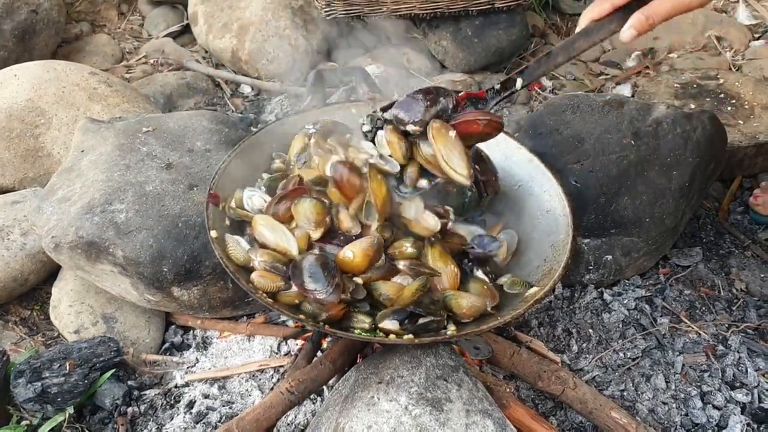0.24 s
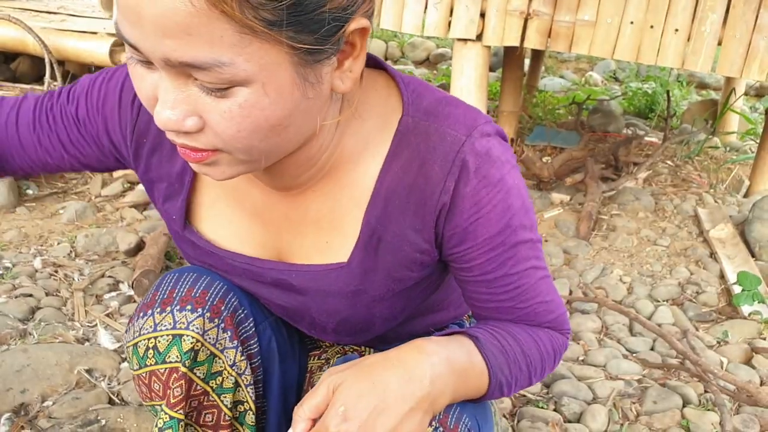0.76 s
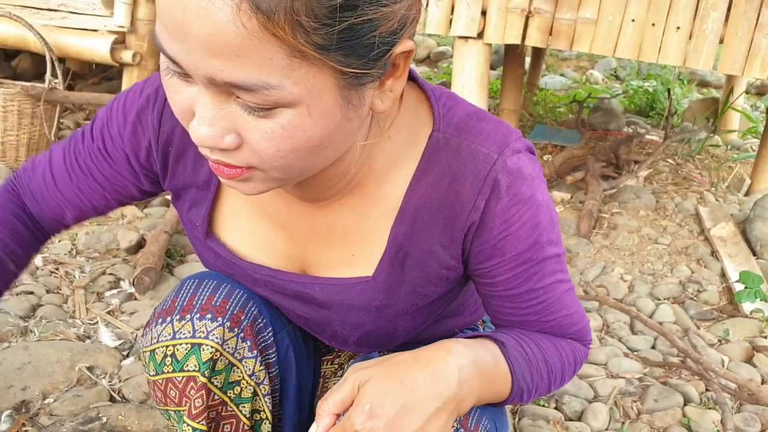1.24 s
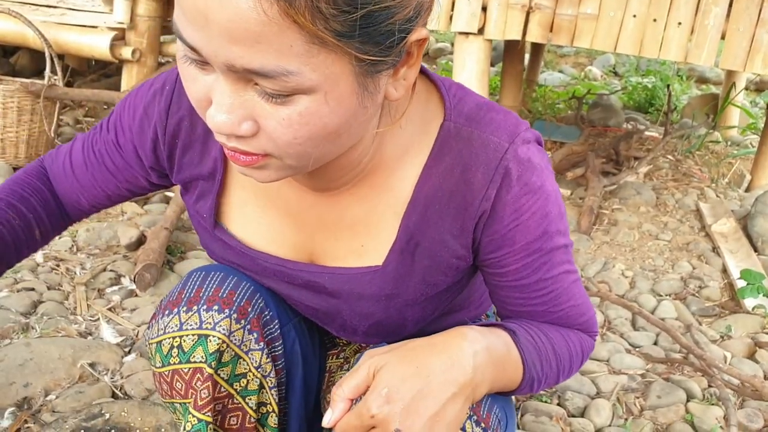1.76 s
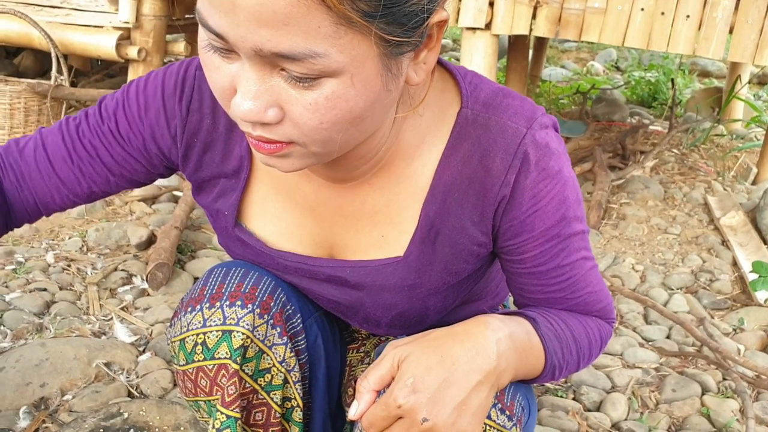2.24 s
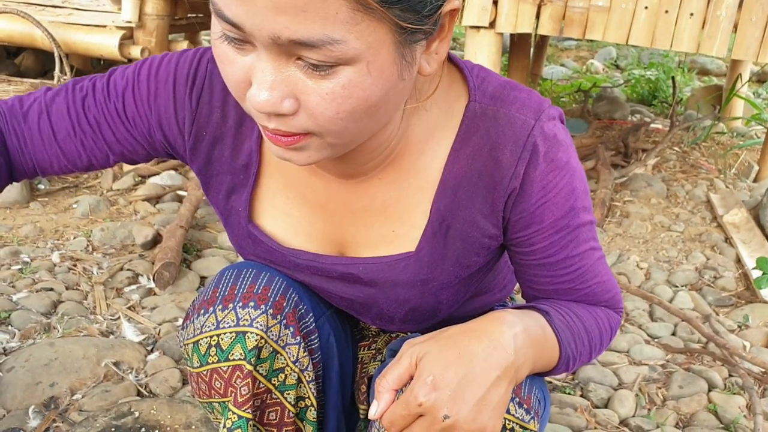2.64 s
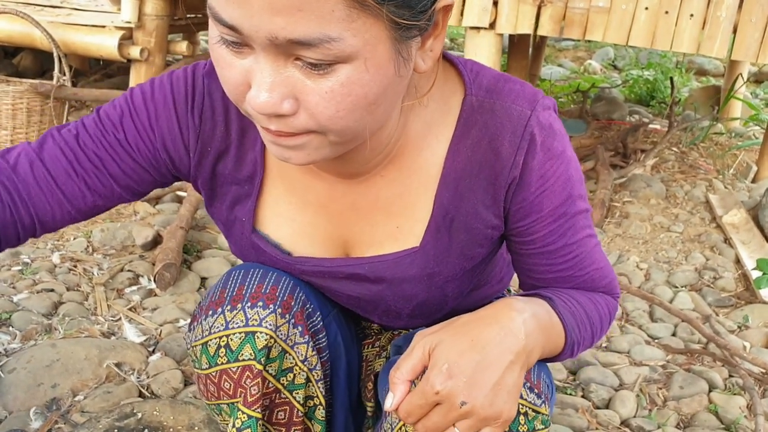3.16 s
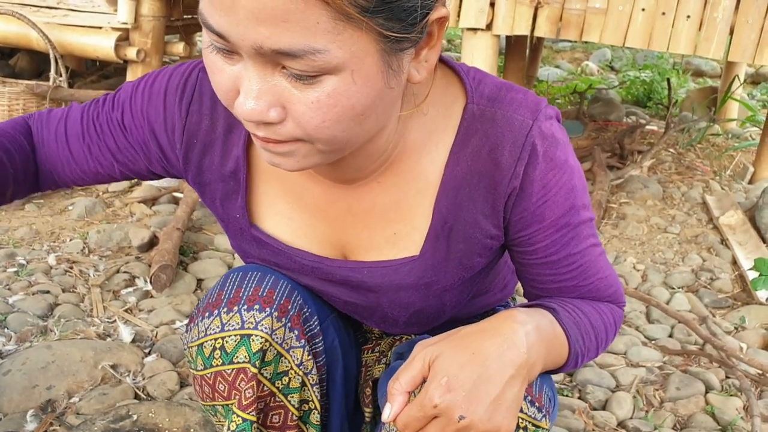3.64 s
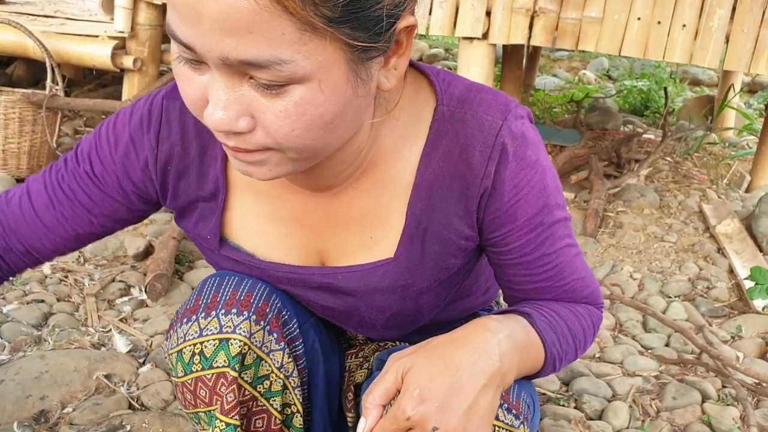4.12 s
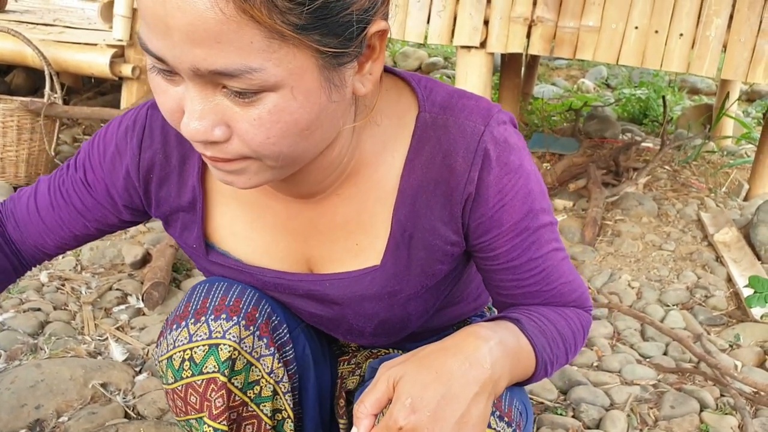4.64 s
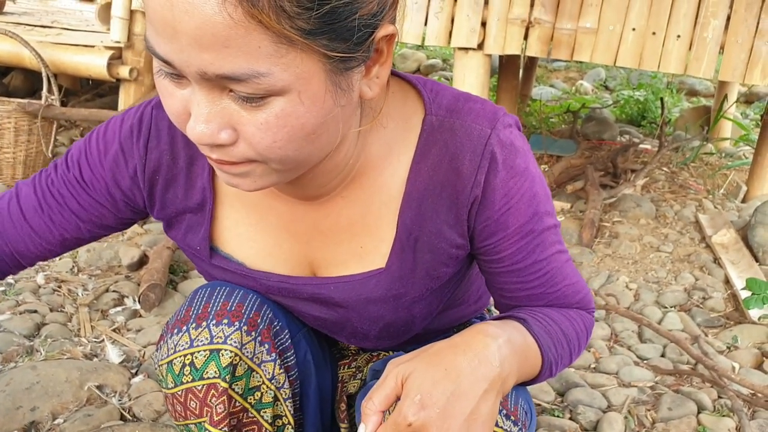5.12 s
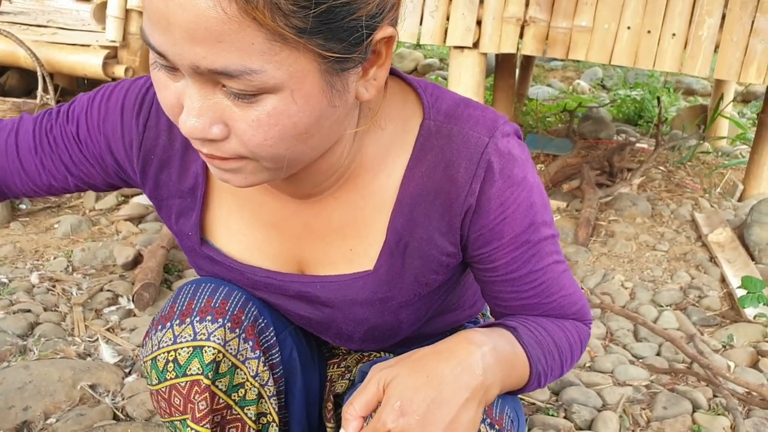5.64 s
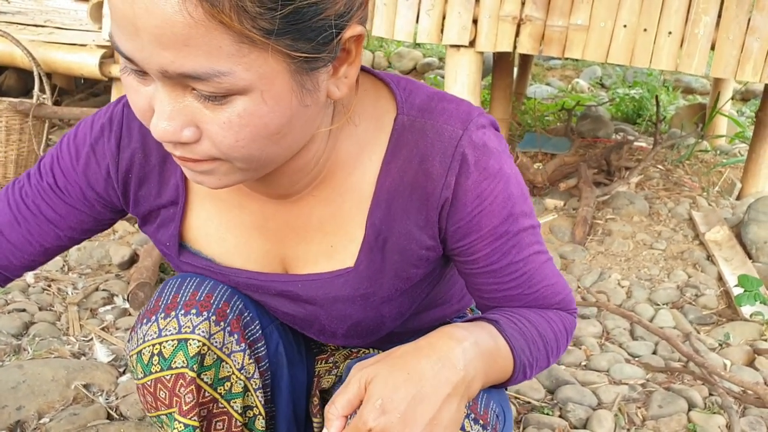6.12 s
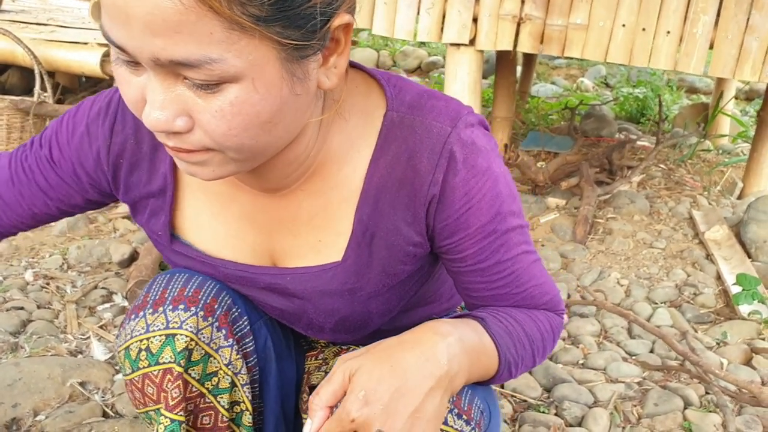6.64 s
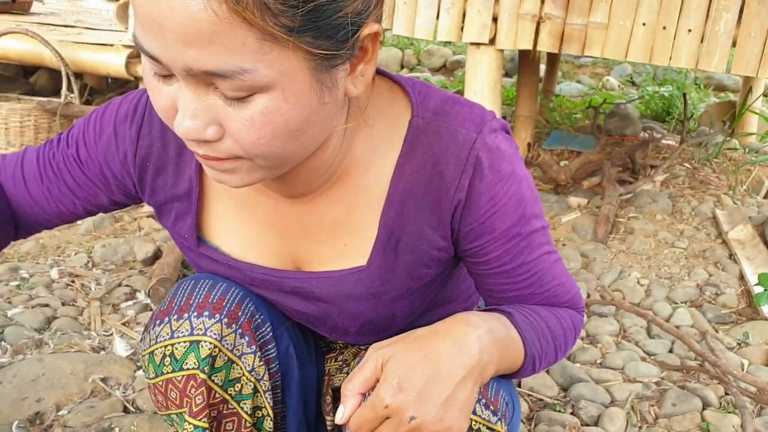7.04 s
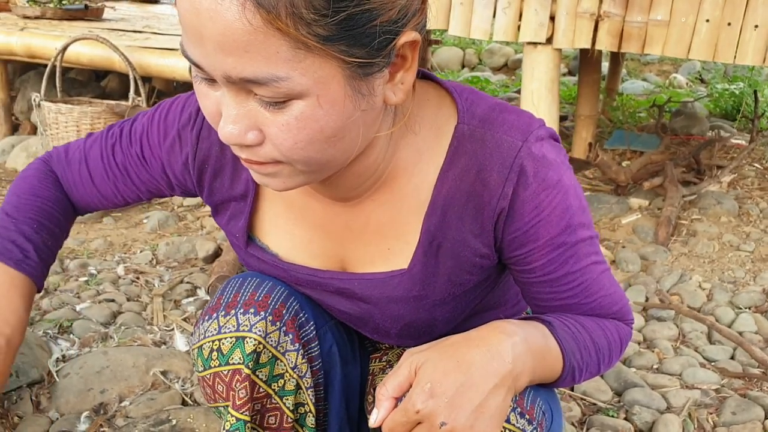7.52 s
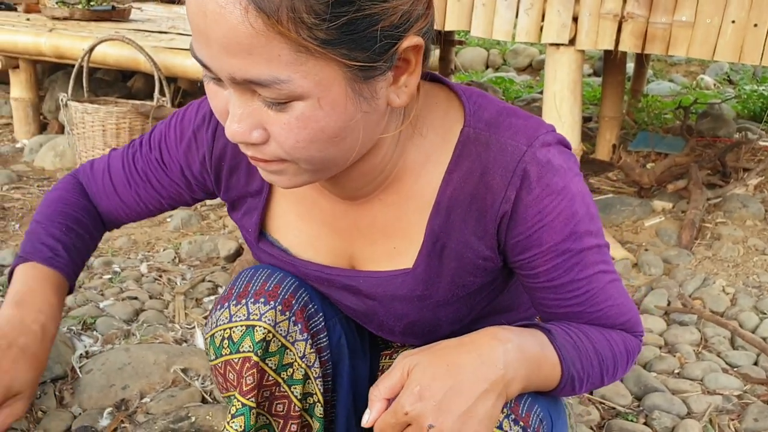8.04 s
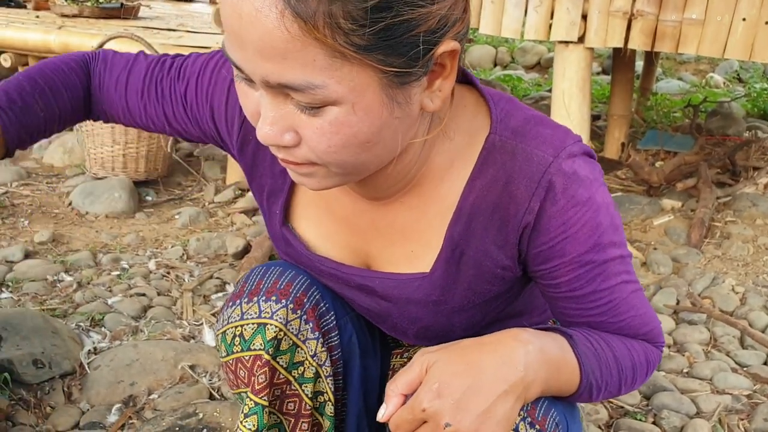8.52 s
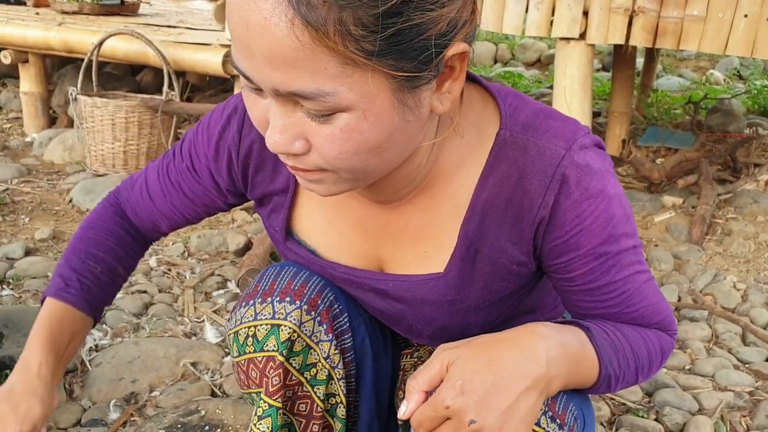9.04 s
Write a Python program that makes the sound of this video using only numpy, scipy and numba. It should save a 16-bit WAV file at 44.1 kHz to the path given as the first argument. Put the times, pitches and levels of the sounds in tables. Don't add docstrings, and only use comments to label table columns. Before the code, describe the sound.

Dense bright rattling of hard shells, dull pan thuds and hissing broth above a soft fire rumble, with faint bird hoots and a distant engine.

```python
import sys
import numpy as np
from scipy import signal
from scipy.fft import rfft, irfft
from scipy.io import wavfile
from scipy.ndimage import uniform_filter1d
from numba import njit

SR = 44100
rng = np.random.default_rng(int(sys.argv[2]) if len(sys.argv) > 2 else 0)


def voltage_ratio(level):
    return 10 ** (np.asarray(level, float) / 20)


def to_wav(sig):
    pcm = np.clip(np.atleast_2d(sig), -1, 1) * 32767
    pcm = np.round(pcm).astype(np.int16)
    wavfile.write(sys.argv[1], SR, pcm.T)


N = 408807
LAG = 13


def curve(table, hz):
    f, db = np.transpose(table)
    return voltage_ratio(np.interp(np.log(hz + 1), np.log(f), db))


def colour(x, table):
    return irfft(rfft(x) * curve(table, np.arange(N // 2 + 1) * SR / N), N)


def unit(x):
    return x / np.sqrt(np.mean(x ** 2))


def walk(rate):
    k = int(SR / rate)
    held = np.repeat(rng.standard_normal(N // k + 1), k)
    return 1.35 * uniform_filter1d(uniform_filter1d(held, k), k)[:N]


# frequency in Hz, gain in dB.
SHADE = [(100, -0.5), (500, -5), (2400, -2), (4400, -8.5), (9000, -13.5), (15000, -7.5)]


def late(x):
    return colour(np.roll(x, LAG), SHADE)


# frequency in Hz, density in dB per Hz.
AIR = [(20, -31), (45, 7.5), (80, 10), (130, 8), (200, 5.5), (350, 0), (700, -5.5), (1200, -15),
       (2000, -16.5), (6000, -42), (8000, -30), (10500, -34), (16000, -41)]
# time in seconds, level in dB.
FLAMES = [
    (0.0, -53.5),
    (0.07, -37.5),
    (2.7, -36.5),
    (4.6, -37.5),
    (5.9, -38),
    (9.27, -39),
]


def fire():
    near, a, b = rng.standard_normal((3, N))
    apart = [(30, -1.0), (70, -5.0), (150, -19.5), (600, 4.0), (3000, 5)]
    left = near + colour(a, apart)
    right = late(near) + colour(late(b), apart)
    air = colour(np.array([left, right]), AIR)
    rumble = colour(air, [(220, 0), (500, -30)])
    sizzle = air - rumble
    s, rumble_db = np.transpose(FLAMES)
    swell_db = np.interp(np.arange(N) / SR, s, rumble_db - np.mean(rumble_db))
    flutter_db, sizzle_db = 0.8 * walk(7), 0.8 * walk(1.67)
    return unit(rumble * voltage_ratio(swell_db + flutter_db) + sizzle * voltage_ratio(sizzle_db)) * voltage_ratio(-49.5)


# time in seconds, level in dB.
BROTH = [(0.0, -66), (0.75, -69), (1.0, -47), (2.3, -55), (3.0, -66), (3.9, -51), (4.6, -62), (5.703, -64),
         (5.77, -76), (5.978, -51), (6.3, -69), (7.2, -56.5), (7.9, -47.5), (8.7, -47.5), (9.05, -50),
         (9.27, -59)]
# frequency in Hz, density in dB per Hz.
HISS = [(1200, -14.5), (2500, -4.5), (5000, 0), (8000, -4), (11000, 1), (16000, 1.5)]
HISS = [(1200, -14.5), (2500, -4.5), (5000, 0), (8000, -4), (11000, 1), (16000, 1.5)]


def broth():
    s, db = np.transpose(BROTH)
    t, flicker_db = np.arange(N) / SR, 1.2 * walk(25)
    hiss = unit(colour(rng.standard_normal((2, N)), HISS))
    hiss = hiss * voltage_ratio(np.interp(t, s, db) + flicker_db) * voltage_ratio([[2.5], [-4.5]])
    simmer = [(500, -8), (1400, 4), (2800, -13)]  # (Hz, dB)
    boil = unit(colour(rng.standard_normal((2, N)), simmer)) * voltage_ratio(-55 + 3.8 * walk(30.1))
    simmer_ends_s = 1.025
    return hiss + boil * np.clip((simmer_ends_s - t) / 0.03, 0, 1)


@njit
def ring(n, start, pole, rise, left, right, lag):
    out = np.zeros((2, n + 9000))
    for k in range(len(start)):
        z, open_ = 1. + 0j, 1.
        for i in range(start[k], start[k] + min(8000, int(-7 / np.log(abs(pole[k]))))):
            z, open_ = z * pole[k], open_ * rise[k]
            out[0, i] += left[k] * (1 - open_) * z.imag
            out[1, i + lag[k]] += right[k] * (1 - open_) * z.imag
    return out[:, :n]


def strike(s, db, hz, cycles, contact_ms, side):
    s, db, hz, side = (np.broadcast_to(v, hz.shape).ravel() for v in (s, db, np.clip(hz, 150, 16500), side))
    beam = rng.standard_normal((len(hz), 2)).T * np.clip(hz / 4000, 0, 1)
    t60 = cycles * np.sqrt(3000 / hz) / 3000
    pole = np.exp((2j * np.pi * hz - np.log(1000) / t60) / SR)
    rise = np.exp(-1000 / (contact_ms * SR) * np.sqrt(hz / 3000))
    lag = np.clip(np.round(LAG + 2.0 * side + 2.4 * beam[0]), 0, 40).astype(np.int64)
    right = voltage_ratio(db + 0.5 * side + 2 * beam[1]) * curve(SHADE, hz)
    start = np.clip(s * SR, 0, N - 1).astype(np.int64)
    return ring(N, start, pole, rise, voltage_ratio(db), right, lag)


def grains(db, centre_hz, spread, size_db, cycles, count, order=3):
    c = rng.standard_normal((3, count, order))
    s = rng.random((count, 1)) * N / SR
    size = size_db * np.minimum(rng.exponential(size=(count, 1)), 2.4)
    hz = centre_hz * np.exp(spread * np.clip(c[0], -1.7, 2.5))
    x = strike(s, size + 3.7 * c[1], hz, cycles=cycles, contact_ms=0.18, side=c[2, :, :1])
    return unit(x) * voltage_ratio(db)


def surges(table, rest_db):
    t = np.arange(0, N / SR, .002)
    peak_s, db, swell_s, settle_s = np.transpose(table)[:, :, None]
    under_db = 20 * np.maximum((peak_s - t) / abs(swell_s), (t - peak_s) / abs(settle_s))
    power = voltage_ratio(2 * rest_db) + np.sum(voltage_ratio(2 * (db - under_db)), axis=0)
    return np.interp(np.arange(N) / SR, t, 10 * np.log10(power))


# peak in seconds, rattle level in dB, swell and settle in
# seconds per 20 dB.
TUMBLES = [(0.119, -43, 0.45, 0.042), (0.232, -41, 0.18, 0.83), (0.572, -38, 0.11, 0.071),
           (0.847, -33, 0.077, 0.042), (0.99, -43, 0.24, 0.04), (1.224, -32.5, 0.094, 0.39),
           (1.818, -37, 0.71, 0.042), (2.15, -43, 0.67, 0.12), (2.346, -38, 0.037, 0.12),
           (2.62, -42, 0.54, 0.9), (2.84, -46.5, 0.21, 0.11), (3.253, -31.5, 0.024, 0.13),
           (3.428, -35, 0.1, 0.067), (3.58, -35.5, 0.36, 0.16), (4.123, -30, 0.15, 0.13),
           (4.4, -50.5, 0.52, 0.3), (4.889, -36, 0.25, 0.23), (5.141, -36, 0.22, 0.045),
           (5.3, -41.5, 0.15, 0.24), (5.408, -34.5, 0.12, 0.41), (5.715, -43, .9, 0.028),
           (6.05, -27, 0.06, 0.19), (6.436, -34, 0.079, 0.19), (6.676, -35, 0.4, 0.14),
           (6.9, -37, 0.18, 0.18), (7.307, -34, 0.037, 0.1), (7.518, -30.5, 0.12, 0.2),
           (8.055, -36.5, 0.13, 0.09), (8.19, -32.5, 0.19, 0.12), (8.8, -27.5, 0.09, 0.14),
           (9.187, -44.5, 0.14, 0.43)]
# peak in seconds, scrape level in dB, swell and settle in
# seconds per 20 dB.
DRAGS = [(0.0, -42.5, .1, 0.13), (0.32, -40.5, 0.39, 0.21), (0.572, -42, 0.32, 0.13),
         (0.847, -39.5, 0.059, 0.14), (1.224, -35.5, 0.15, 1), (1.818, -38.5, 0.16, 0.07),
         (2.093, -48.5, 0.54, 0.6), (2.68, -42.5, 0.39, 0.19), (3.3, -47, 0.078, 0.64),
         (4.123, -33, 0.12, 0.22), (4.75, -50.5, 0.7, 1), (5.45, -43.5, 0.21, 0.23),
         (6.15, -32, 0.17, 0.12), (6.436, -45, 0.21, 0.088), (6.676, -45.5, 0.65, 0.093),
         (6.801, -37, 0.015, 0.027), (7.307, -44, 0.049, 0.075), (7.518, -37, 0.18, 0.35),
         (8.1, -48, 0.12, 1), (8.806, -39.5, 0.23, 1), (9.187, -38, 0.048, 0.038)]


def heap():
    rattle_db, scrape_db = surges(TUMBLES, rest_db=-90.5), surges(DRAGS, rest_db=-76.5)
    grate_db = rattle_db - 9.5 - 0.13 * (scrape_db + 64)
    edge_db = 10 * np.log10(voltage_ratio(2 * -89) + voltage_ratio(2 * grate_db))
    jostle_db, drag_db = 2.2 * walk(60), 2.2 * walk(40)
    shell_db = rattle_db - 5.0 + jostle_db - 0.083 * (scrape_db + 46)
    wash_db = 0.7 * rattle_db + 0.45 * scrape_db + 5.5
    shells = grains(shell_db, centre_hz=4400, spread=0.656, size_db=4.0, cycles=12.9, count=2600, order=12)
    wash = grains(wash_db, centre_hz=2806, spread=0.53, size_db=0.5, cycles=8.9, count=16000)
    edges = grains(edge_db - 0.5 + jostle_db, centre_hz=11900, spread=0.19, size_db=8.0, cycles=6.7,
                   count=8000, order=5)
    pan = grains(scrape_db + 0.5 + drag_db, centre_hz=924, spread=0.28, size_db=3.0, cycles=17.4, count=11000)
    return shells + wash + edges + pan


# start in seconds, peak level in dB, main mode in Hz.
CLACKS = [(0.1942, -7, 5080), (0.2403, -12, 4400), (0.2793, -17.5, 5200), (0.5572, -18.5, 3400),
          (0.6129, -18, 4600), (1.199, -17, 6600), (1.2196, -11.5, 2350), (1.4342, -15.5, 2440),
          (1.4578, -16, 3630), (1.6138, -16, 5800), (1.6603, -18.5, 3360), (1.7736, -12.5, 2390),
          (1.814, -10, 5040), (2.8091, -16.5, 3630), (4.041, -14.5, 1970), (4.067, -8.5, 2360),
          (4.115, -19, 2460), (4.999, -12.5, 3200), (5.724, -11.5, 4640), (5.9328, -17, 2750),
          (6.003, -5.5, 3110), (6.4258, -6.5, 4100), (6.6524, -9.5, 7150), (7.2704, -23, 2760),
          (7.5738, -10, 3340), (7.6691, -22, 2950), (8.7995, -8, 3150), (8.8143, -5, 3250),
          (9.1304, -12, 4050), (9.187, -15.5, 2780)]
CLICKS = [(0.036, -23.5, 3770), (0.1248, -17.5, 3700), (0.394, -19, 2490), (1.103, -16, 3960),
          (1.743, -18, 6840), (1.784, -15, 4820), (1.8621, -14.5, 3970), (1.9236, -12.5, 2980),
          (2.0502, -16.5, 3530), (2.752, -19, 4940), (3.4161, -7.5, 4480), (4.2722, -21, 3720),
          (4.851, -13, 4760), (4.888, -14, 5400), (4.934, -14, 4800), (5.2777, -15.5, 4330),
          (5.2875, -11.5, 3400), (6.2023, -17, 3900), (6.474, -19.5, 4050), (6.631, -15, 3900),
          (6.703, -5.5, 4880), (6.805, -14.5, 3300), (6.903, -18, 6300), (7.513, -13, 3000),
          (8.077, -19, 4000), (8.1307, -9, 4900), (8.1983, -13, 5200), (8.793, -20, 2640),
          (8.8198, -32, 2920), (8.974, -20.5, 4500)]
SNAPS = [(0.2285, -15.5, 6840), (1.414, -9.5, 6270), (1.8058, -11.5, 9850), (1.823, -8, 4170),
         (1.853, -12, 6300), (1.9821, -11.5, 3900), (2.3418, -19.5, 5140), (2.5875, -24, 12900),
         (2.664, -21.5, 9100), (3.249, -21.5, 5430), (3.8509, -9, 11700), (3.851, -12.5, 6250),
         (4.135, -14.5, 6700), (4.7816, -18, 4380), (5.1458, -15, 11600), (5.2179, -19, 9600),
         (5.2358, -14, 8700), (5.2695, -10.5, 10300), (5.4241, -13, 11500), (5.4245, -17, 10300),
         (5.6772, -24, 9700), (6.3724, -14, 4150), (6.663, -15.5, 4880), (6.6893, -9.5, 9400),
         (6.792, -22.5, 10200), (7.0524, -17.5, 5370), (7.3613, -20.5, 6100), (8.049, -8, 3960),
         (8.119, -11, 8450), (8.146, -18, 10000), (8.173, -10.5, 5600), (8.2531, -23, 10500)]
SLIPS = [(0.704, -23, 9000), (0.454, -26, 3200), (0.511, -21, 5000), (0.6023, -21, 3370),
         (1.4468, -24, 3220), (1.765, -18, 4200), (2.0832, -21.5, 4750), (2.1234, -21, 2350),
         (2.1743, -26, 4760), (3.5656, -23, 4100), (3.793, -27, 5680), (3.8096, -28.5, 3480),
         (4.453, -27.5, 2700), (4.7395, -23, 3320), (4.7686, -18, 10200), (5.0757, -23, 9900),
         (5.1866, -20.5, 4030), (5.2246, -17.5, 4400), (5.5656, -20, 4400), (5.7305, -19.5, 10300),
         (6.2216, -20, 4760), (6.5357, -22, 3600), (6.6794, -14, 5700), (7.072, -20.5, 4270),
         (7.4416, -22.5, 2970), (7.775, -22, 4850), (7.835, -22, 4580), (7.8943, -21, 9000),
         (8.261, -19.5, 3400), (8.9537, -16.5, 3900)]
BUMPS = [(0.0333, -18.5, 1940), (0.3838, -26, 3400), (0.4269, -24, 2240), (0.497, -18, 3130),
         (0.6386, -28, 3860), (0.8272, -19.5, 3360), (0.8376, -25, 3320), (1.1527, -19.5, 1970),
         (1.2054, -21, 4570), (1.2284, -20, 2670), (1.2541, -20, 2520), (1.4871, -29, 3600),
         (1.559, -28, 5860), (1.611, -17.5, 1870), (1.6555, -20, 3000), (2.0112, -23, 2740),
         (2.1271, -27, 2880), (2.4476, -23.5, 3800), (2.9174, -40, 5120), (3.2447, -19, 3120),
         (3.253, -16, 5700), (3.6667, -34, 4740), (4.0963, -17, 2220), (4.1018, -20, 3040),
         (4.184, -19, 2130), (4.2234, -28, 5040), (4.5734, -31.5, 5170), (4.7011, -28, 3300),
         (4.8472, -21, 2870), (4.9744, -25, 4310), (5.0965, -30, 4180), (5.2934, -17.5, 3020),
         (5.3555, -26, 3320), (5.5097, -32, 4180), (5.6513, -33, 3490), (5.6686, -25, 3230),
         (6.0581, -14, 2600), (6.0773, -32, 3570), (6.109, -24, 1870), (6.1303, -18, 2520),
         (6.2614, -24.5, 3380), (6.4086, -26, 2220), (6.4646, -19, 2630), (6.5458, -21.5, 6760),
         (6.669, -23, 4050), (6.7093, -18, 5100), (6.8024, -20, 5380), (7.3173, -22, 4170),
         (7.5089, -28, 4220), (7.5158, -24, 3010), (7.5707, -28, 2020), (7.6123, -18, 3160),
         (7.6654, -15.5, 3200), (8.6259, -28, 4480), (8.8082, -30, 3100), (8.8377, -24, 2840)]
TICKS = [(0.1099, -22, 2730), (0.1181, -19.5, 6420), (0.1842, -20, 2820), (0.1967, -20, 5080),
         (0.2186, -16, 7110), (0.233, -29, 2190), (0.2879, -26, 5040), (0.482, -24, 5560),
         (0.5322, -34, 6760), (0.5932, -20.5, 4350), (0.6883, -35, 4570), (0.8295, -32.5, 2970),
         (0.867, -21.5, 5470), (1.419, -25, 4950), (1.6853, -18, 3830), (1.6958, -23, 3060),
         (1.7472, -24, 3700), (1.77, -19, 4610), (1.7917, -18, 4820), (1.906, -31, 4390),
         (2.033, -24, 2710), (2.099, -25, 2200), (2.6032, -20, 2220), (2.8304, -23.5, 1530),
         (2.8787, -28.5, 5210), (3.2924, -21, 4570), (3.616, -26.5, 3700), (3.991, -42, 1510),
         (3.9927, -24, 3460), (4.1414, -18.5, 2690), (4.8934, -25, 5700), (4.927, -25, 4350),
         (5.393, -15.5, 2710), (5.398, -26, 3700), (5.5495, -23, 5900), (6.5495, -26, 1720),
         (6.5759, -24, 5500), (6.6074, -23, 2090), (6.7567, -30, 3120), (6.7991, -26, 5470),
         (6.853, -28, 3360), (6.8974, -26, 6240), (7.3145, -26, 4660), (7.523, -26, 3250),
         (7.5823, -20, 4090), (7.5987, -19, 1490), (8.1163, -20, 4370), (8.1395, -18, 4820),
         (8.163, -21, 5080), (8.1915, -20, 4350), (8.21, -18, 4390), (8.6838, -31, 4700)]
CHIPS = [(0.0767, -27, 4000), (0.3363, -21.5, 3470), (0.3777, -27, 10900), (0.388, -32, 12100),
         (0.4875, -28, 6300), (0.5542, -19.5, 4610), (1.7362, -20, 4650), (1.941, -25, 3800),
         (1.999, -23, 9820), (2.3355, -22.5, 10900), (2.362, -27, 4950), (2.4197, -30, 4570),
         (2.6792, -25, 11500), (2.7183, -33, 9700), (4.8, -24, 10500), (4.875, -29, 5600),
         (4.9543, -28, 10030), (5.0665, -27, 10120), (5.129, -20, 8400), (5.1341, -19, 9800),
         (5.1514, -18, 11500), (5.1528, -24, 2410), (5.1949, -23, 10120), (5.4636, -23, 4780),
         (5.5, -29, 5860), (5.683, -22.5, 10100), (5.707, -30, 4950), (6.3695, -17.5, 4740),
         (6.7294, -26, 5640), (6.7357, -28.5, 6760), (6.7372, -28, 6550), (6.8564, -25, 10210),
         (6.8803, -20.5, 6600), (6.901, -27, 6070), (6.9065, -30, 3920), (6.9425, -26, 6800),
         (6.9908, -34, 4800), (7.0222, -29, 11500), (7.1674, -32.5, 10120), (7.965, -33, 2200),
         (8.0315, -22, 11890), (8.0454, -17, 9500), (8.202, -17.5, 4310), (8.367, -32, 14770),
         (8.4692, -29, 12140), (8.753, -21, 2540), (8.7736, -19.5, 5210), (8.835, -21, 4690)]


def knocks():
    kinds = [CLACKS, CLICKS, SNAPS, SLIPS, BUMPS, TICKS, CHIPS]
    tick_db = [-15.5, -11.5, -3.5, -14.5, -17, -10, -4]
    s, db, hz = np.concatenate(kinds).T[:, :, None]
    bright_db = np.repeat(tick_db, [len(k) for k in kinds])[:, None]

    def vary(modes):
        return rng.standard_normal((len(s), modes))

    side = vary(1)
    soon = s + 0.00046 * abs(vary(8))
    body = strike(s, db - 8.0, hz, cycles=36.5, contact_ms=0.085, side=side)
    near_hz = hz * np.exp(0.26 * vary(5))
    near = strike(soon[:, :5], db - 6 + 2.0 * vary(5), near_hz, cycles=13.6, contact_ms=0.31, side=side)
    broad_hz = np.sqrt(4200 * hz) * np.exp(0.39 * vary(8))
    broad = strike(soon, db - 14.0 + 1.7 * vary(8), broad_hz, cycles=24.0, contact_ms=0.19, side=side)
    octaves = np.linspace(-0.55, 0.45, num=16) + 0.046 * vary(16)
    tick = strike(s + 0.00015 * abs(vary(16)), db + bright_db - 4.0 + 2.9 * vary(16), 11500 * 2 ** octaves,
                  cycles=17.2, contact_ms=0.067, side=side)
    crack = strike(s, db + 0.51 * bright_db + 7.0, 0.96 * hz, cycles=5.1, contact_ms=0.043, side=side)
    return body + near + broad + tick + crack


# start in
# seconds, peak level in dB, mode in Hz.
THUDS = [(0.034, -27.5, 1220), (0.578, -21, 685), (1.1024, -20, 550), (1.4138, -25.5, 820),
         (1.613, -31, 731), (1.862, -30.5, 754), (2.0892, -27.5, 1050), (2.238, -31.5, 940),
         (2.831, -41, 1530), (3.988, -24, 854), (4.0413, -27, 1380), (4.739, -30, 1020),
         (4.7807, -29.5, 990), (4.8865, -29, 1050), (5.2868, -25.5, 730), (5.4224, -40, 1010),
         (5.5391, -30.5, 920), (5.649, -32.5, 1010), (5.932, -23, 1160), (6.4253, -28, 840),
         (6.52, -31, 1020), (6.548, -29.5, 1260), (6.608, -15, 570), (6.7911, -27.5, 764),
         (6.8794, -30.5, 1065), (7.268, -33.5, 623), (7.5116, -22.5, 1390), (7.6677, -22.5, 1080),
         (8.627, -28.5, 800), (9.1306, -26, 1040),
         (0.237, -30.5, 1900),
    (0.279, -38, 1100),
    (0.394, -33, 1500),
    (0.552, -26.5, 620),
    (4.353, -31.5, 550),
    (4.488, -35.5, 780),
    (6.075, -24, 556),
    (8.902, -22.5, 560),
    (9.245, -30.5, 790),
         (0.2003, -33, 1160),
    (1.1534, -29, 520),
    (1.202, -24, 1020),
    (1.4344, -25.5, 730),
    (2.653, -32, 785),
    (6.4513, -31, 1470),
    (7.598, -26, 1460),
]
PAN_HZ = [427, 586, 790, 1020, 1294, 1900]


def thuds():
    s, db, hz = np.transpose(THUDS)[:, :, None]
    detune, delay, uneven = rng.standard_normal((3, len(s), 6))
    modes = np.array(PAN_HZ) * np.exp(0.036 * detune)
    reach_db = -5 * abs(np.log2(modes / hz))
    level_db = db + 8.5 + reach_db + 1.15 * uneven
    return strike(s + 0.001023 * abs(delay), level_db, modes, cycles=26.7, contact_ms=0.57, side=0)


def stones(x, t60_ms, db, count=4):
    t = np.arange(3000) / SR
    place = np.repeat(rng.integers(0, count, N // 600 + 1), 600)[:N]
    decay = np.exp(-np.log(1000) * 1000 * t / t60_ms) * (1 - np.exp(-t / 0.0025))
    out = 0
    for k in range(count):
        tail = rng.standard_normal((2, len(t))) * decay
        tail = tail / np.sqrt(np.sum(tail ** 2, axis=1, keepdims=True))
        here = uniform_filter1d(1. * (place == k), size=100)
        out = out + signal.oaconvolve(x[:1] * here, tail, axes=1)[:, :N]
    return voltage_ratio(db) * np.array([out[0], voltage_ratio(4.0) * late(out[1])])


# frequency in Hz, gain in dB.
PORT = [(1000, -3.5), (4000, 5), (6500, 7.5), (8000, -1), (10500, 5), (15500, -5.5)]


def port_colour(x):
    cepstrum = irfft(np.log(curve(PORT, np.arange(1025) * SR / 2048)))
    cepstrum = cepstrum * np.r_[1, 2 * np.ones(1023), 1, np.zeros(1023)]
    response = irfft(np.exp(rfft(cepstrum)))[None, :512]
    return signal.oaconvolve(x, response, axes=1)[:, :N]


def bird():
    t = np.arange(N) / SR
    hoots = 0
    for k in range(4):
        swell = np.exp(-((t - 3.98 - 0.354 * k) / 0.063) ** 2)
        hoots = hoots + swell * np.sin(2 * np.pi * (346 - 9 * k) * t)
    return voltage_ratio(-53.5) * hoots


# time in seconds, firing rate in Hz, level in dB.
ENGINE = [
    (6.5, 77.97, -60),
    (7.1, 85, -54),
    (9.27, 75.1, -51),
]


def engine():
    s, hz, db = np.transpose(ENGINE)
    t = np.arange(N) / SR
    phase = 2 * np.pi * np.cumsum(np.interp(t, s, hz) * (1 + 0.0154 * walk(15))) / SR
    fade_in = np.clip((t - s[0] + 0.34) / 0.47, 0, 1)
    level = fade_in * voltage_ratio(np.interp(t, s, db) + 3.0 + 0.52 * walk(9.0))
    return level * (np.sin(phase) + voltage_ratio(-15.5) * np.sin(2 * phase))


def scene():
    pan = heap() + knocks() + thuds()
    pan = port_colour(pan + stones(pan, t60_ms=28.2, db=-8.0))
    return fire() + broth() + pan + bird() + engine()


def top_cut(x):
    return signal.sosfilt(signal.butter(12, 15900, fs=SR, output="sos"), x)


def record(dry):
    mix = np.tanh(dry)
    return top_cut(mix)


dry = scene()
out = record(dry)
to_wav(out)
```